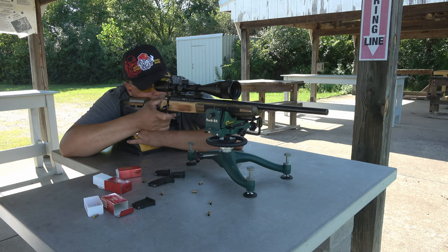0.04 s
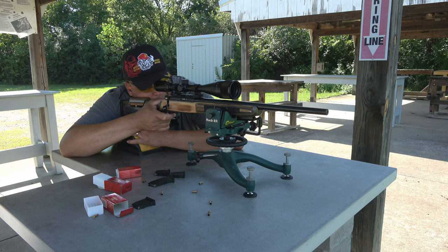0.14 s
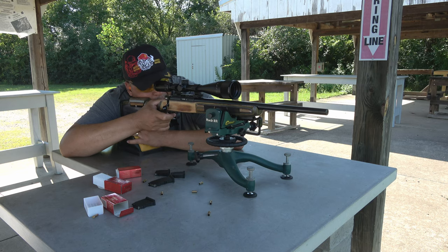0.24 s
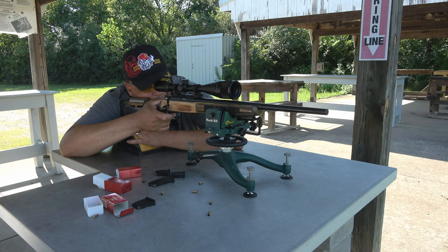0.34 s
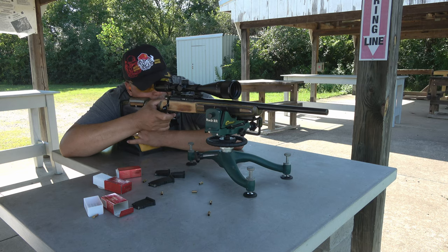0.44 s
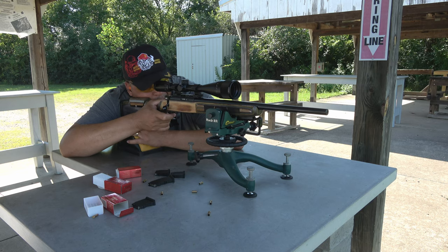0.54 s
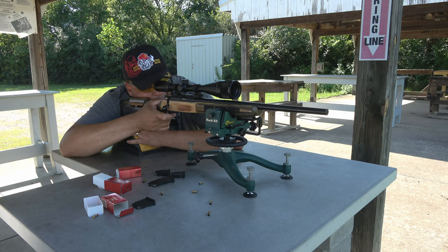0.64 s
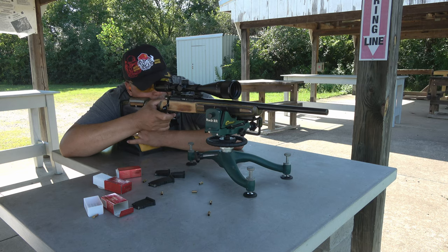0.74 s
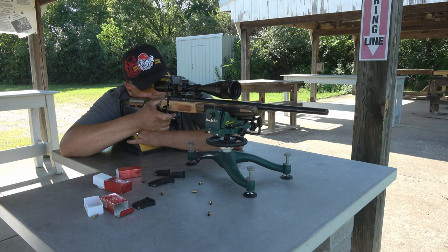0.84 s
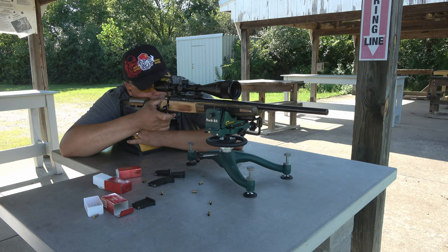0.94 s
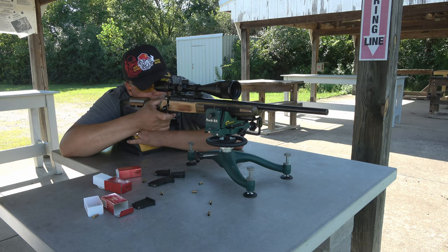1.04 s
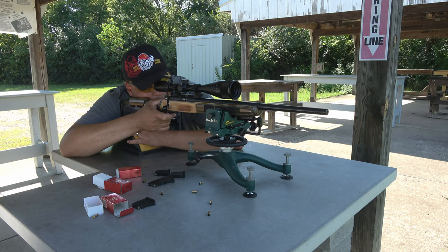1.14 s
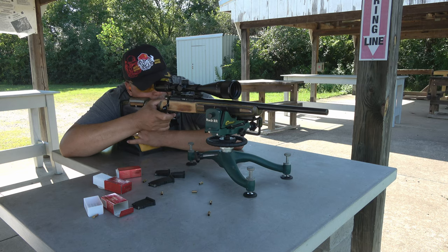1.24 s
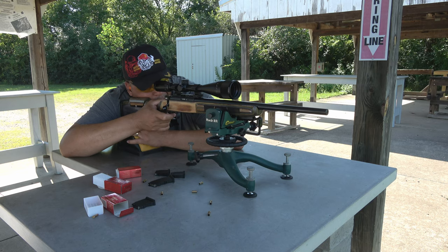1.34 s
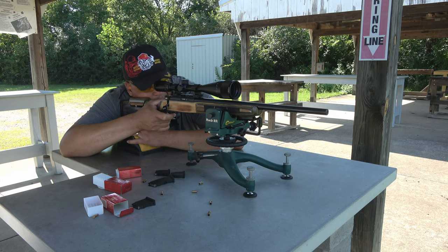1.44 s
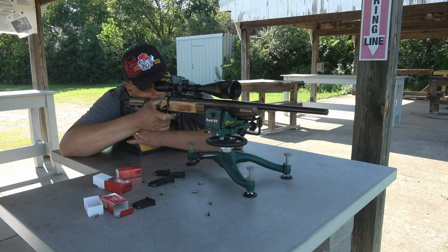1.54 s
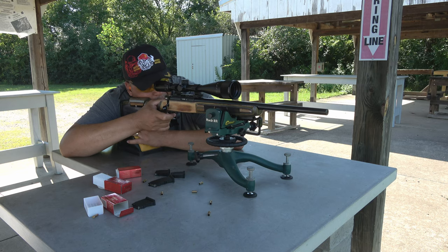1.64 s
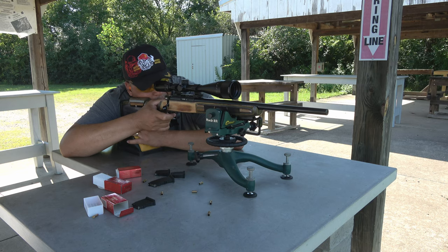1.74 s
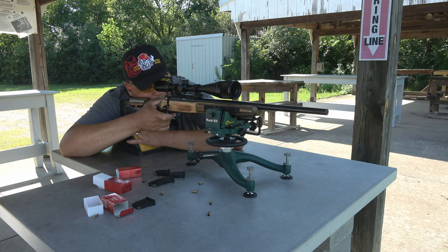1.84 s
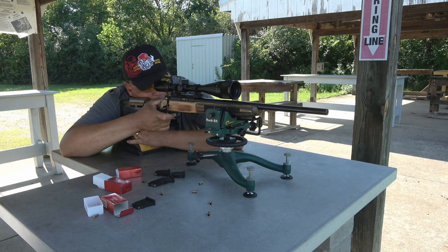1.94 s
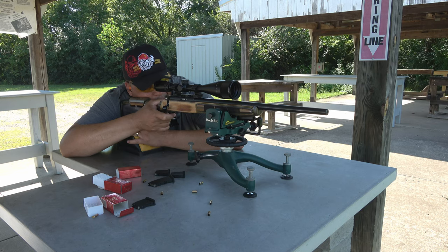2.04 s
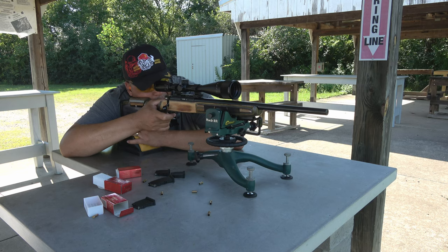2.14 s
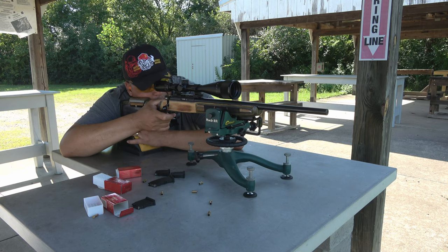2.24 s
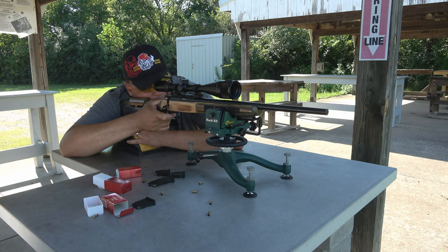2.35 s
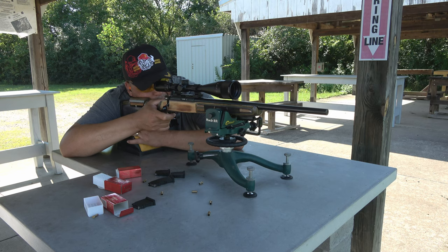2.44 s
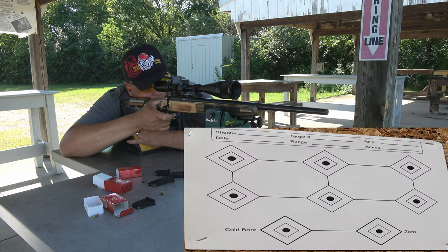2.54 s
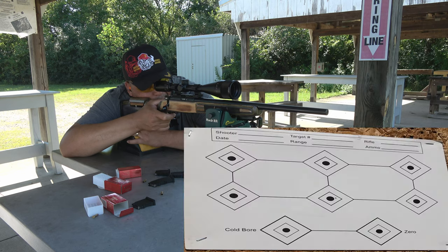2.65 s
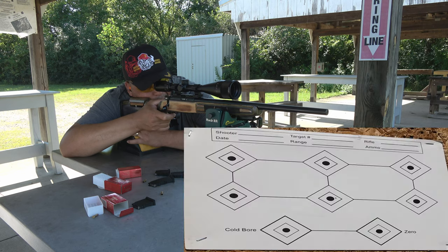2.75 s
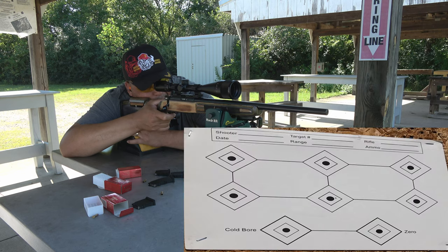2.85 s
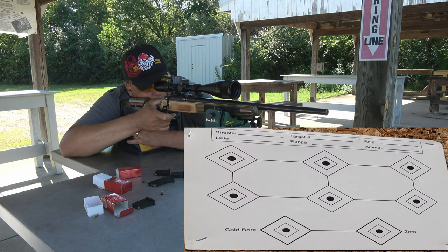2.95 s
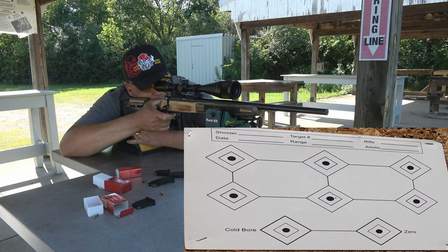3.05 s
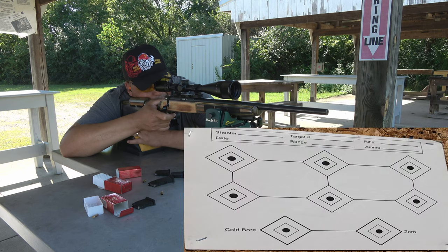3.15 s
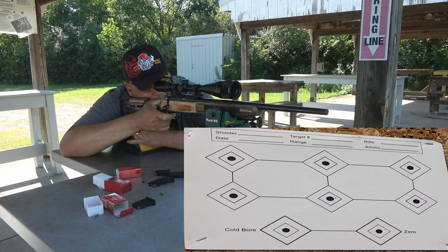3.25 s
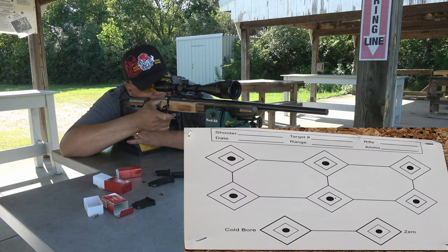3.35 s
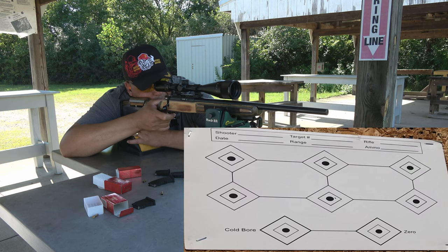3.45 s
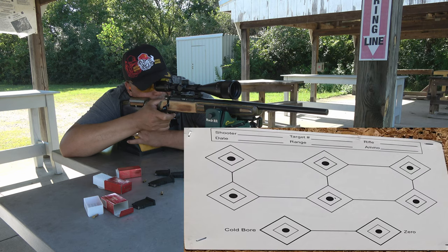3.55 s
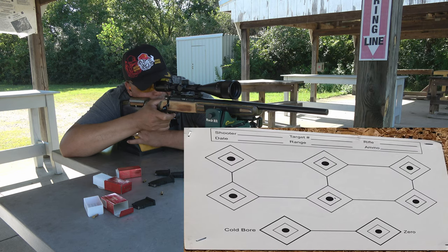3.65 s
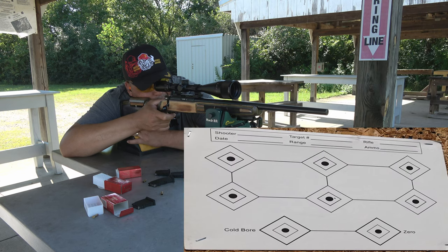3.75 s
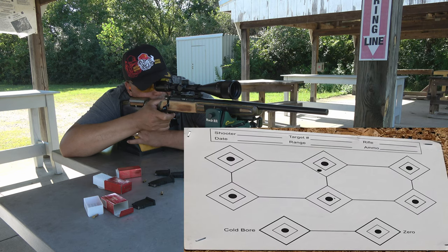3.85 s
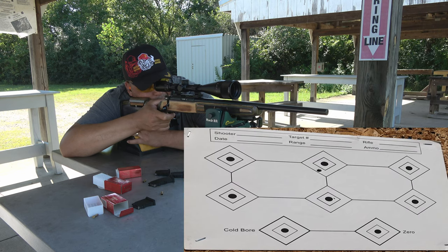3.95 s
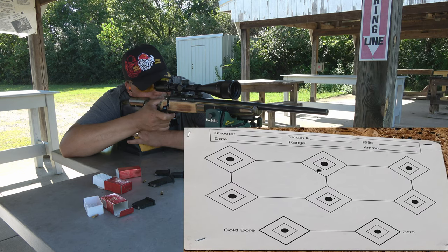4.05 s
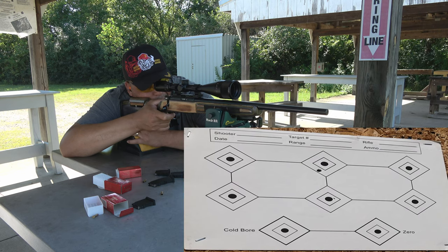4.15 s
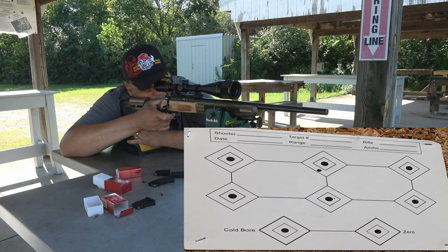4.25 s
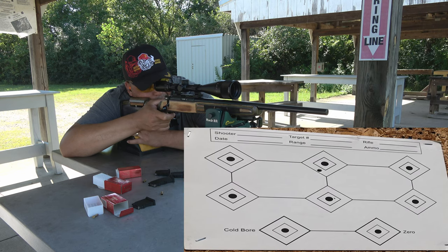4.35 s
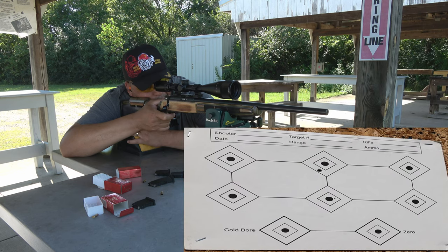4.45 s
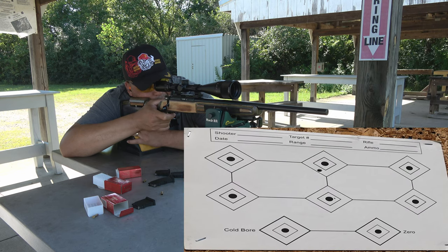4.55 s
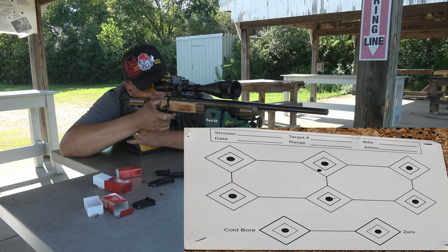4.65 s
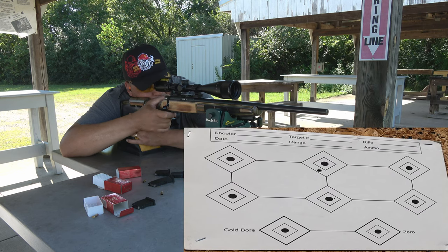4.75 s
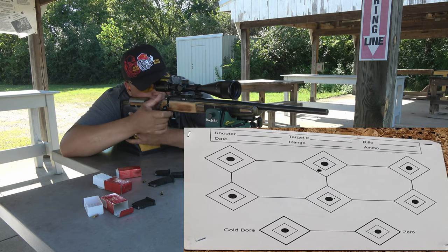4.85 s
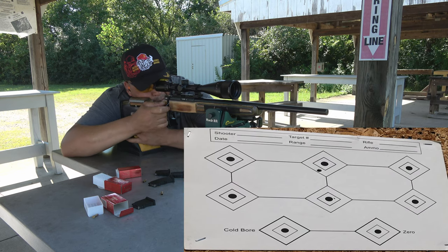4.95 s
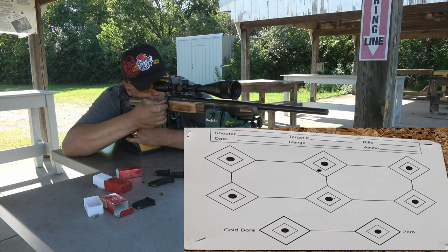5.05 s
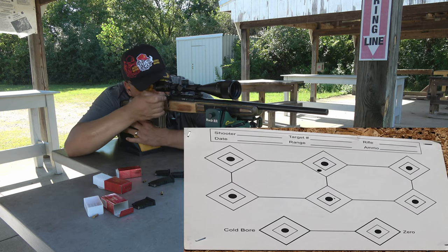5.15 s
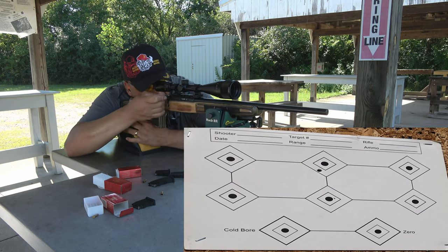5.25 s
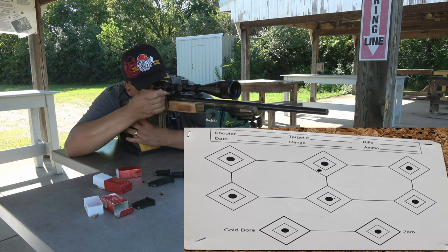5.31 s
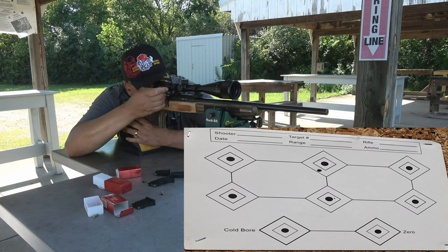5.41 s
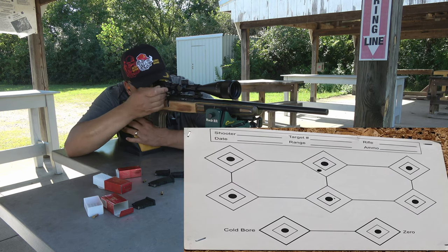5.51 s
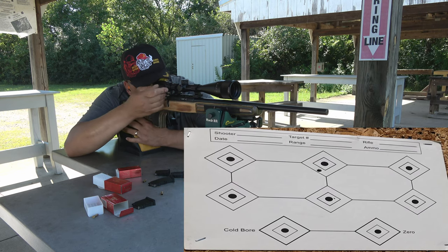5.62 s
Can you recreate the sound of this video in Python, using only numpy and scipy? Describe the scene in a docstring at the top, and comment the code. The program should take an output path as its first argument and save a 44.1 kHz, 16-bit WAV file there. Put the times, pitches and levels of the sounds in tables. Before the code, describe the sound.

Over chirping crickets, a single rifle shot cracks and echoes, then the bolt clicks open.

```python
"""Crickets and katydids sing in summer grass by stridulation, over a faint rumble, a bird and two far shots.
Near 3.9 s a small-bore rifle fires from a bench under a range shelter, and its blast wave overloads
the microphone. The shelter reverberates, the target boards reflect the crack and the trees echo it.
Then the bolt is lifted and drawn, each impact exciting modes of steel and wood, as the insects sing on."""
import sys
import numpy as np
from scipy import signal
from scipy.fft import rfft, irfft
from scipy.io import wavfile

SR = 44100
rng = np.random.default_rng(int(sys.argv[2]) if len(sys.argv) > 2 else 0)


def wav_record(signal):
    """Record a signal, one row per channel, as 16-bit PCM in the file named by sys.argv[1]."""
    frames = np.transpose(np.atleast_2d(signal))
    bounded = np.clip(frames, -1, 1)
    # unit amplitude maps onto the largest positive 16-bit level
    quanta = np.round(bounded * 32767).astype(np.int16)
    wavfile.write(sys.argv[1], SR, quanta)


N = 250488
T = np.arange(N) / SR
HZ = np.maximum(np.arange(N // 2 + 1) * SR / N, 1)


def undb(db):
    """Amplitude ratio of a level in decibels."""
    return 10 ** (np.asarray(db) / 20)


def unit(x):
    """Normalisation to rms 1."""
    return x / np.sqrt(np.mean(x ** 2))


def lookup(points, hz):
    """Interpolation of (f/Hz, value) points on a logarithmic frequency axis."""
    f, value = np.transpose(points)
    return np.interp(np.log(hz), np.log(f), value)


def shape(x, response):
    """Linear filtering, normalised to conserve the power of white noise."""
    return irfft(rfft(x) * response / np.sqrt(np.mean(np.abs(response) ** 2)), N)


def noise(spectrum):
    """Coloured noise of rms 1 from points of (f/Hz, relative level/dB)."""
    return shape(rng.standard_normal(N), undb(lookup(spectrum, HZ)))


def fade(start, t60):
    """Exponential decay from a sudden onset, 60 dB in t60 seconds."""
    return (T >= start) * np.exp(-np.log(1000) * np.maximum(T - start, 0) / max(t60, 1e-3))


def swells(rows):
    """Half-cosine envelopes from rows of (centre t/s, duration/s, level/dB)."""
    return sum(undb(db) * np.cos(np.pi * np.clip((T - s) / length, -.5, .5)) for s, length, db in rows)


def bursts(rows):
    """Incoherent addition: noise bursts of (t/s, level/dB, T60/s) sum in power."""
    return rng.standard_normal(N) * np.sqrt(sum((undb(db) * fade(s, t60)) ** 2 for s, db, t60 in rows))


def ring(x, modes, top_hz):
    """Modal superposition: damped resonators driven through a contact that passes little above top_hz."""
    softness = 1 / (1 + 1j * np.sqrt(2) * HZ / top_hz - (HZ / top_hz) ** 2)
    resonance = sum(undb(db) / (1 + 1j * (HZ / hz - hz / HZ) * hz / width) for hz, width, db in modes)
    return shape(x, softness ** 2 * resonance)


def diffuse(colour, decays, start, hold):
    """A diffuse field: steady for hold seconds, then each octave decays with its own reverberation time."""
    spectrum, out = rfft(noise(colour)), 0
    octave = np.clip(np.log2(HZ), 6, 14)
    for k in range(6, 15):
        band = irfft(spectrum * np.maximum(1 - np.abs(octave - k), 0), N)
        decay = fade(start + hold, lookup(decays, 2. ** k))
        out = out + band * np.where(T < start + hold, T >= start, decay)
    return out


def reverberate(x, t60, wet_db, dull_hz):
    """Convolution adds a tail of scattered reflections that has lost some treble."""
    tail = rng.standard_normal(N) * fade(0, t60) * (1 - np.exp(-T / 0.0077))
    lowpass = signal.butter(2, dull_hz, fs=SR, output="sos")
    tail = signal.sosfilt(lowpass, tail / np.sqrt(np.sum(tail ** 2)))
    return x + undb(wet_db) * signal.fftconvolve(x, tail[:SR])[:N]


# outdoor background spectrum: f/Hz, relative level/dB
AIR_SPECTRUM = [(20, -13.5), (45, -10), (85, 1), (125, 1.5), (190, -8), (300, -11.5), (600, -14.5),
                (1100, -19), (2000, -26), (3500, -29.5), (6000, -29), (12000, -34.5), (15500, -35)]
# puffs of breeze: centre t/s, duration/s, level/dB
BREEZE_PUFFS = [(2.17, .6, -62.5), (2.76, .36, -62)]
# envelope of the top-octave hiss: t/s, level/dB
HISS_LEVELS = [(0, -82), (.6, -82), (1.5, -74), (2.5, -79), (3.5, -71.5), (4.7, -76), (5.68, -79)]
def air():
    """Ambient noise: a steady rumble, breeze brushing the microphone and a thin, slowly swelling hiss."""
    breeze = noise([(10, -6), (30, 0), (50, -2), (90, -20), (300, -55), (1000, -90)])
    hiss = noise([(8000, -30), (10500, -0.5), (14000, 0), (15700, -2), (17000, -30)])
    hiss_gain = undb(np.interp(T, *np.transpose(HISS_LEVELS)))
    return undb(-60) * noise(AIR_SPECTRUM) + swells(BREEZE_PUFFS) * breeze + hiss_gain * hiss


# distant reports: t/s, relative level/dB
FAR_REPORTS = [(0.499, -61.5), (2.89, -61.5)]
# their spectrum: f/Hz, relative level/dB
FAR_SPECTRUM = [(150, -19), (500, -3.5), (800, 1), (1100, -3), (1700, -12), (2800, -18.5), (5000, -43)]
def far_shots():
    """Long-range propagation turns distant reports into soft, dull swells."""
    swell = sum(undb(db) * fade(s, 0.95) * (1 - fade(s, 0.096)) for s, db in FAR_REPORTS)
    return undb(5.5) * swell * noise(FAR_SPECTRUM)


# calls of a distant bird: t/s, relative level/dB
CALLS = [(2.475, -70), (3.765, -72)]
def bird():
    """Scattering by trees blurs short calls into swells of narrow-band noise."""
    calls = sum(undb(db) * fade(s, .35) * (1 - fade(s, 0.046)) for s, db in CALLS)
    return calls * noise([(2500, -30), (3000, 0), (3300, -1), (3800, -30)])


def trill():
    """Narrow-band noise is heard as a pitch: a faint, even insect trill that sets in late."""
    onset = np.clip((T - 4.72) / .1, 0, 1)
    return undb(-73) * onset * noise([(5300, -60), (5620, -7), (5750, 0), (5880, -19), (6200, -60)])


# a tiny insect's ticks: first t/s, end t/s, rate/Hz, level/dB
TICK_RUN = (.015, .25, 32, -63)
def ticking():
    """A short periodic pulse train, heard as very high, faint insect ticks."""
    first, end, rate, db = TICK_RUN
    ticks = bursts((s, db, .04) for s in np.arange(first, end, 1 / rate))
    return shape(ticks, undb(lookup([(10000, -30), (13000, -7), (15000, 0), (17000, -30)], HZ)))


def stridulate(bouts, hz, period, length, drop_hz, step_hz, swell_db, count):
    """Stridulation: each evenly paced chirp is count wing closures, each singing one falling note."""
    out = np.zeros(N + SR)
    u = np.arange(int(length * SR)) / (length * SR)  # progress through a note, 0 to 1
    envelope = np.sin(np.pi * u ** 0.79) ** 2
    spread_db = 1.44
    chirps = [(s, db) for first, end, spacing, db in bouts
              for s in np.arange(first, min(end, N / SR), spacing)]
    for s, db in chirps:
        for k, (detune, size, phase) in enumerate(rng.standard_normal((count, 3))):
            # the wing slows as it closes; later notes start higher, but all end near the same pitch
            pitch = hz * (1 + 0.0044 * detune) + step_hz * np.sqrt(k) * (1 - u) - drop_hz * (u + u ** 3) / 2
            note = envelope * np.sin(2 * np.pi * (phase + np.cumsum(pitch) / SR))
            gain = undb(db + spread_db * size + swell_db * (k - (count - 1) / 2))
            at = int((s + k * period) * SR)
            out[at:at + len(u)] += gain * note
    return out[:N]


# wing resonance of the chorus: f/Hz, relative level/dB
WING_SPECTRUM = [(5900, -50), (6250, -31.5), (6600, -15), (6900, -6), (7200, 0), (7900, 1), (8150, -2),
                 (8330, -1), (8550, -16.5), (8750, -20.5), (9400, -21.5), (10200, -34), (11500, -44.5)]
# its singers: stroke rate/Hz, relative level/dB
KATYDID_SINGERS = [(50.2, -52), (79.7, -52), (66.8, -53.5)]
# a small katydid's bouts of short, high buzzes: first t/s, end t/s, spacing/s, level/dB
BUZZES = [(.03, 1.43, .216, -58), (1.554, 2.63, 0.17, -56.5), (2.714, 3.92, .186, -56.5),
          (4.527, 5.65, .205, -57.5)]
def katydids():
    """File-and-scraper excitation of wing resonances: a steady rasping chorus and one buzzing singer."""
    chorus = 0
    for rate, db in KATYDID_SINGERS:
        drift = .012 * noise([(1, -1), (4, -10), (30, -80), (100, -140)])
        stroke = np.cumsum(rate * (1 + drift)) / SR % 1
        # teeth of the file pass ever more slowly during each stroke, and unevenly
        tooth_hz = 8450 - 1950 * stroke + 220 * noise([(20, 0), (600, -3), (3000, -40.5)])
        scrape = np.sin(np.pi * stroke) * np.sin(2 * np.pi * np.cumsum(tooth_hz) / SR)
        direct = unit(shape(scrape, undb(lookup(WING_SPECTRUM, HZ) / 2)))
        scattered = noise(WING_SPECTRUM)  # by grass and leaves
        chorus = chorus + undb(db) * (undb(-5.5) * direct + undb(-0.5) * scattered)
    buzz = stridulate(BUZZES, hz=9734, period=0.0065, length=0.006,
                      drop_hz=620, step_hz=14, swell_db=0.05, count=8)
    return chorus + reverberate(buzz, t60=0.32, wet_db=-7.5, dull_hz=14000)


# bouts of a near, a higher-pitched and a far cricket: first t/s, end t/s, spacing/s, relative level/dB
NEAR_CRICKET = [(.067, 1.4, .39, -46), (1.641, 2.55, 0.37, -46), (2.914, 3.5, .388, -47),
                (4.648, 4.85, .39, -48.5)]
HIGH_CRICKET = [(.068, 1.15, .317, -52.5), (1.309, 2.6, .283, -53), (2.853, 3.9, .308, -52.8),
                (4.425, 5.2, .547, -52)]
FAR_CRICKET = [(.04, 3.85, .402, -58), (4.43, 5.75, .385, -58.5)]
def crickets():
    """Three crickets smeared by the shelter; the direct-to-reverberant ratio falls with distance."""
    near = stridulate(NEAR_CRICKET, hz=4754, period=.040, length=.026,
                      drop_hz=696, step_hz=150.6, swell_db=0.5, count=3)
    high = stridulate(HIGH_CRICKET, hz=5170, period=.035, length=.026,
                      drop_hz=520, step_hz=110, swell_db=1.4, count=3)
    far = stridulate(FAR_CRICKET, hz=4970, period=.044, length=.038,
                     drop_hz=750, step_hz=120, swell_db=-1.5, count=3)
    return (reverberate(near, t60=.53, wet_db=-6.5, dull_hz=12010)
            + undb(-1) * reverberate(high, t60=.35, wet_db=-3, dull_hz=11990)
            + undb(-11) * reverberate(far, t60=.35, wet_db=13, dull_hz=12000))


# slides of the sleeve: centre t/s, duration/s, level/dB
SLEEVE_SLIDES = [(2.62, 0.25, -65), (3.54, 0.18, -64.5), (4.85, 0.51, -59), (5.35, .9, -59.5)]
# cloth friction, coloured by the bench top: f/Hz, relative level/dB
CLOTH_SPECTRUM = [(80, -13.5), (200, -2), (300, -2.5), (400, 4), (520, -3), (750, -5.5), (1500, -12.5),
                  (3500, -19), (9000, -32)]
def sleeve():
    """Sliding friction: the arm settles on the bench before the shot, then moves to work the bolt."""
    return swells(SLEEVE_SLIDES) * noise(CLOTH_SPECTRUM)


# strokes of the action: t/s, level/dB, then relative to it touch/dB, stock thump/dB, steel ring/dB
BOLT_STROKES = [(4.598, -47.5, -20, -14, -5), (4.701, -46, -17, 0, 1.5), (4.743, -49, -16, -12, 4.5),
                (5.1265, -32, -3.5, 0, -10), (5.181, -50.5, -20, -4, -12), (5.370, -43.5, -25, -2, -2),
                (5.3912, -18, -16, -11, -4), (5.4183, -14.5, -1, -2.5, -5.5), (5.6535, -37.5, -25, -7, -30)]
# modes of the receiver, the wooden stock and the small steel parts: f/Hz, bandwidth/Hz, relative level/dB
RECEIVER_MODES = [(1046, 120, -0.5), (1510, 330, 1.5), (1830, 300, 6.5), (2200, 340, -5), (2410, 160, -6),
                  (2870, 360, -13), (3840, 284, -3)]
STOCK_MODES = [(405, 35, 2), (695, 63, 0), (778, 70, -5.5)]
STEEL_MODES = [(3270, 980, 0.5), (4900, 610, -5), (5940, 1000, -2), (7160, 400, 4.5), (8200, 150, 6.5),
               (10800, 3000, -22)]
def bolt():
    """Impact excitation: each stroke touches lightly, rattles against its stop, then shakes the stock."""
    touch_lead_s, stock_lag_s = .0043, .0022
    touch_t60, stop_t60, stock_t60 = .011, .031, .025
    contacts = [(s, db, stop_t60, steel) for s, db, _, _, steel in BOLT_STROKES]
    contacts += [(s - touch_lead_s, db + touch, touch_t60, steel) for s, db, touch, _, steel in BOLT_STROKES]
    blows = [(s + stock_lag_s, db + stock, stock_t60) for s, db, _, stock, _ in BOLT_STROKES]
    body = ring(bursts((s, db, t60) for s, db, t60, _ in contacts), RECEIVER_MODES, top_hz=4970)
    thump = ring(bursts(blows), STOCK_MODES, top_hz=2060)
    bright = ring(bursts((s, db + steel, t60) for s, db, t60, steel in contacts), STEEL_MODES, top_hz=11200)
    # so slim a body radiates little bass
    knocks = signal.sosfilt(signal.butter(2, 250, "high", fs=SR, output="sos"), body + thump + bright)
    return reverberate(knocks, t60=0.21, wet_db=-13, dull_hz=7300)


def woods():
    """Backscatter: a soft echo of the shot rolls in from the woods behind the targets."""
    swell = fade(4.29, 0.64) * (1 - fade(4.29, 0.067))
    spectrum = [(150, -13), (500, -10), (1000, -18), (1900, -1), (2900, 1.5),
                (3700, -4), (5500, -4), (9000, -8.5), (13000, -30)]
    return undb(-39.5) * swell * noise(spectrum)


# cracks returning from target boards and backstop: t/s, T60/s, woody knock level/dB, sharp edge level/dB
ECHOES = [(4.1486, 0.057, -18.5, -28), (4.1568, 0.009, -16.5, -15), (4.1700, 0.014, -19.5, -19),
          (4.1760, 0.052, -17.5, -26), (4.2340, 0.09, -34, -37.5)]
# modes of the boards: f/Hz, bandwidth/Hz, relative level/dB
BOARD_MODES = [(2220, 670, 1.5), (2860, 630, 2)]
# sharp edge of the cracks: f/Hz, relative level/dB
EDGE_SPECTRUM = [(200, -20), (900, -17), (2500, -11), (4500, 0), (8000, -3), (10500, -8), (13000, -19),
                 (15500, -27)]
def targets():
    """Reflection: a cluster of cracks returns from down range and reverberates under the roof."""
    knock = ring(bursts((s, db, t60) for s, t60, db, _ in ECHOES), BOARD_MODES, top_hz=4970)
    # lesser cracks from posts and ground trail the first echo at random, ever weaker
    strays_per_s, fall_db_per_s, spread_db = 170, 170, 4
    jitter, size = rng.random((16, 2)).T
    ages = (np.arange(len(jitter)) + jitter) / strays_per_s
    levels = -23.5 - fall_db_per_s * ages + spread_db * (size - .5)
    strays = [(ECHOES[0][0] + .011 + age, db, .018) for age, db in zip(ages, levels)]
    cracks = bursts([(s, db, t60) for s, t60, _, db in ECHOES] + strays)
    edge = shape(cracks, undb(lookup(EDGE_SPECTRUM, HZ)))
    # the briefest echo keeps its top octave
    start, t60, _, db = min(ECHOES, key=lambda row: row[1])
    treble = undb(lookup([(3000, -25), (8000, 2), (11000, 3), (15500, -12)], HZ))
    snap = shape(bursts([(start, db - 3, t60)]), treble)
    return reverberate(knock + edge + snap, t60=0.24, wet_db=-5, dull_hz=8000)


# muzzle blast, direct and mirrored by the shelter: t/s, level/dB, overpressure duration/s
BLAST_WAVES = [(3.887, 11, 0.0011), (3.8928, 11, 0.0019)]
# the blast scattered by benches, floor and roof, and by the tree line: f/Hz, relative level/dB
SHELTER_SPECTRUM = [(30, -16.5), (70, -6.5), (130, -2), (240, -5), (380, 1), (600, -2.5), (1000, 0.5),
                    (1330, -2), (1570, 1.5), (2600, -3.5), (5000, -4), (8500, -5.5), (10500, -11),
                    (16000, -22.5)]
TREE_SPECTRUM = [(40, -16.5), (100, -8.5), (180, 4.5), (400, -3), (900, -5), (1900, 3), (3000, -1),
                 (5000, -3), (8500, -9), (11000, -17), (15000, -28.5)]
# reverberation times under the roof and from the tree line: f/Hz, T60/s
SHELTER_DECAY = [(50, 0.067), (150, 0.2), (400, 0.41), (1500, 0.3), (5000, 0.29), (9000, 0.3),
                 (15000, 0.17)]
TREE_DECAY = [(100, 1.8), (300, 1.15), (1000, 1.22), (2200, 1), (5000, 0.54), (9000, 1.03), (15000, 0.5)]
def shot():
    """A blast wave: overpressure and rarefaction with turbulent muzzle gas, then reverberation."""
    fire_s = BLAST_WAVES[0][0]
    # the striker and the bullet's snap come just ahead of the blast
    out = undb(-17.5) * noise(SHELTER_SPECTRUM) * fade(fire_s - .0015, .02)
    for start, db, length in BLAST_WAVES:
        age = np.maximum(T - start, 0) / length
        wave = (T >= start) * (1 - age) * np.exp(-age)
        gas = undb(-6) * noise(SHELTER_SPECTRUM) * fade(start, 0.015)
        out = out + undb(db) * (wave + gas)
    # separate posts, benches and rafters make the reflections arrive in clumps
    clumps = undb(noise([(10, -10), (40, 1.5), (150, -3), (500, -26), (2000, -69.5)]))
    shelter = diffuse(SHELTER_SPECTRUM, SHELTER_DECAY, fire_s + 0.0047, hold=0.068)
    first_bounces = noise(SHELTER_SPECTRUM) * fade(fire_s + 0.005, .15)
    trees = diffuse(TREE_SPECTRUM, TREE_DECAY, fire_s + .04, hold=0.12)
    return out + clumps * (undb(-8.5) * shelter + undb(-4) * first_bounces + undb(-29) * trees)


def scene():
    """Superposition of the insects, the open air and the rifle in one channel."""
    outdoors = crickets() + katydids() + trill() + ticking() + bird() + far_shots() + air()
    return (shot() + targets() + woods() + bolt() + sleeve() + outdoors)[None]


def record(dry):
    """Saturation and band limiting: the blast clips the input; the deepest bass and the top are cut."""
    clipped = np.clip(dry, -.95, .95)
    highpass = signal.butter(2, 35, "high", fs=SR, output="sos")
    lowpass = signal.ellip(8, .2, 70, 15700, fs=SR, output="sos")
    return signal.sosfilt(lowpass, signal.sosfilt(highpass, clipped))


dry = scene()
out = record(dry)
wav_record(out)
```